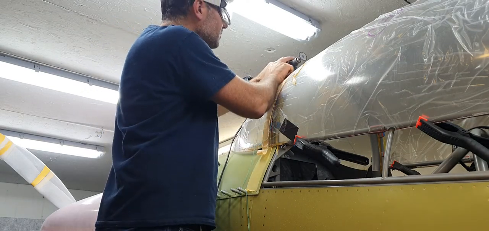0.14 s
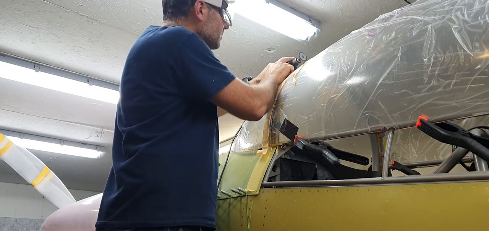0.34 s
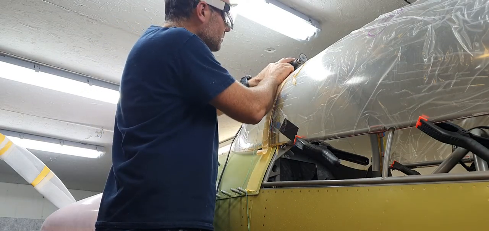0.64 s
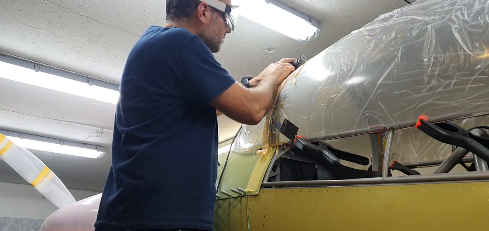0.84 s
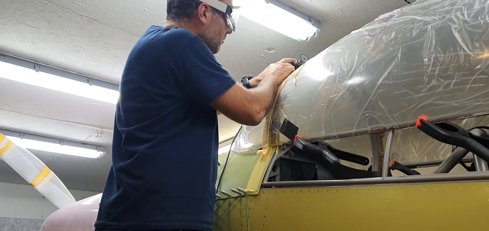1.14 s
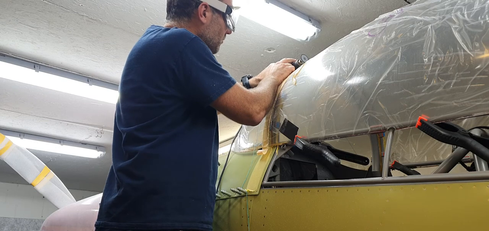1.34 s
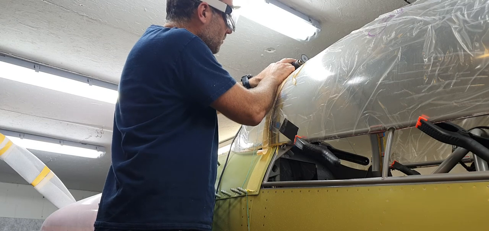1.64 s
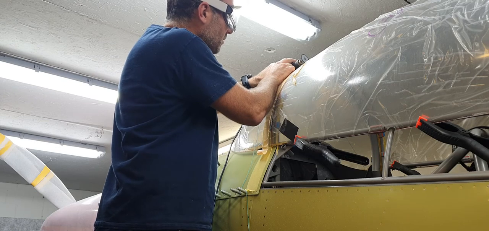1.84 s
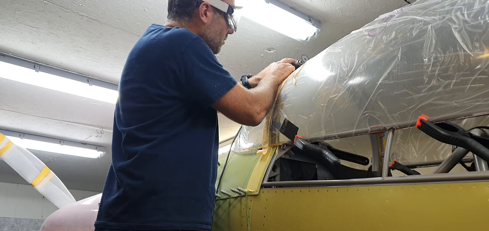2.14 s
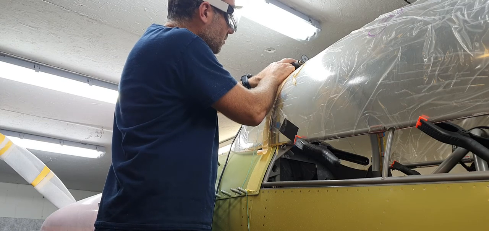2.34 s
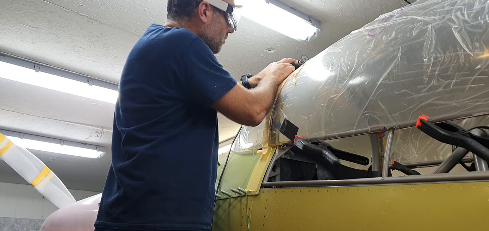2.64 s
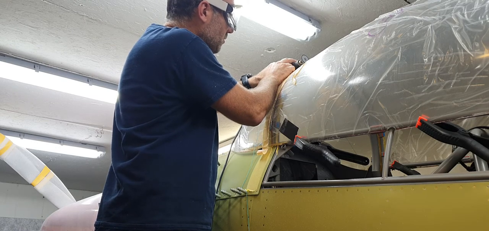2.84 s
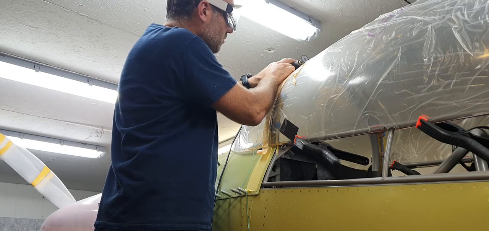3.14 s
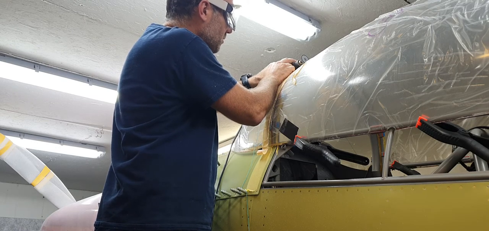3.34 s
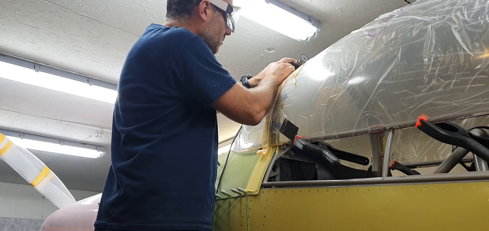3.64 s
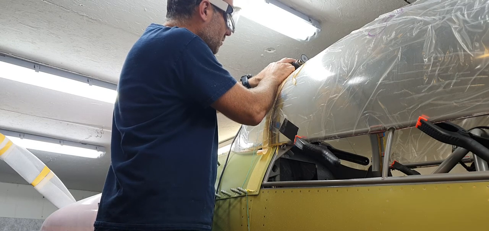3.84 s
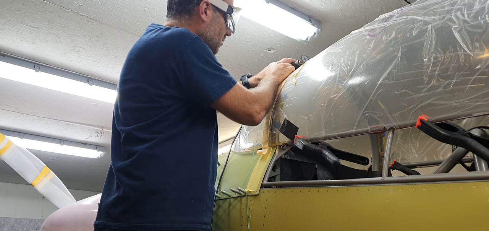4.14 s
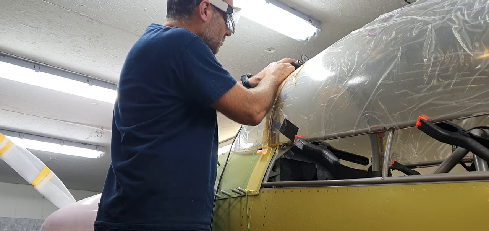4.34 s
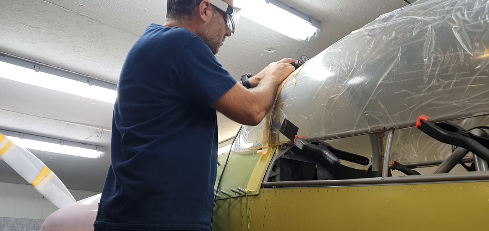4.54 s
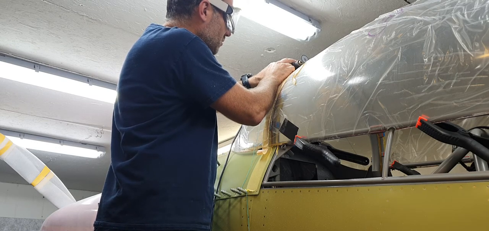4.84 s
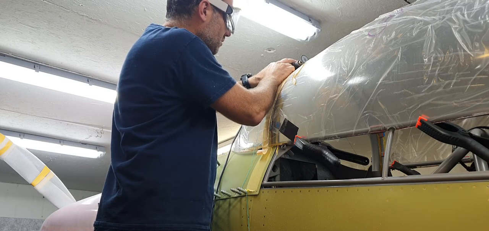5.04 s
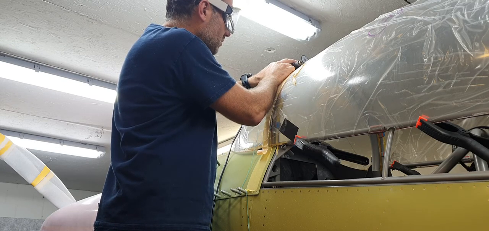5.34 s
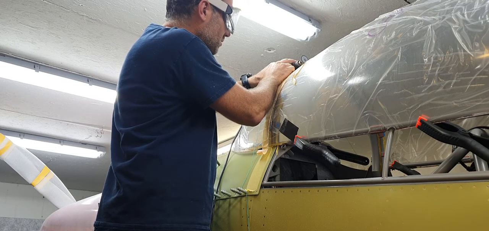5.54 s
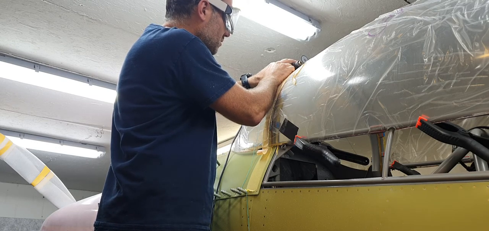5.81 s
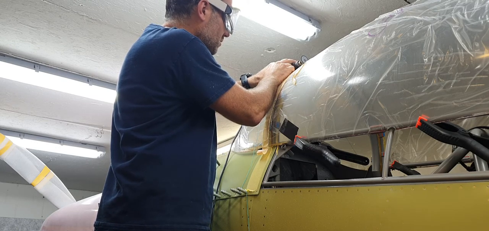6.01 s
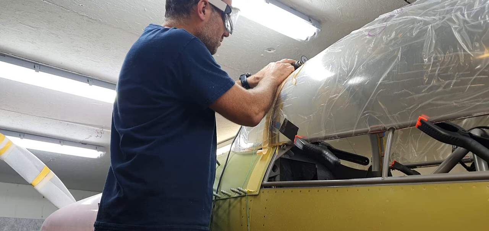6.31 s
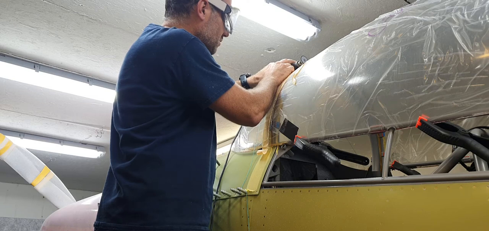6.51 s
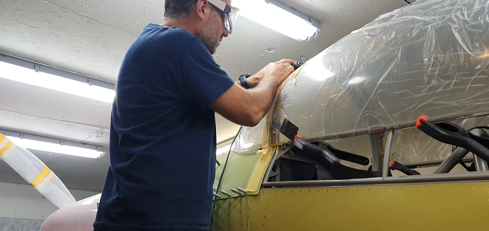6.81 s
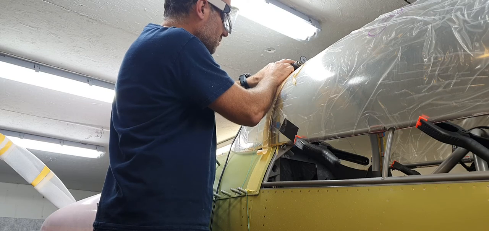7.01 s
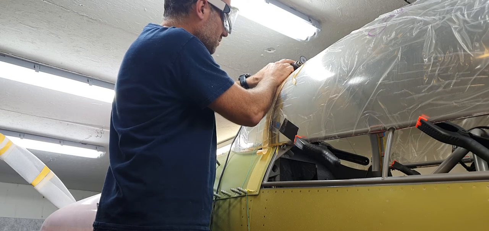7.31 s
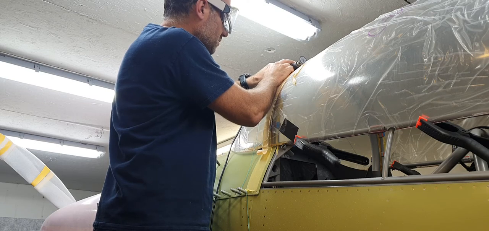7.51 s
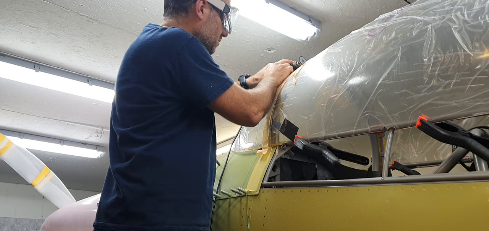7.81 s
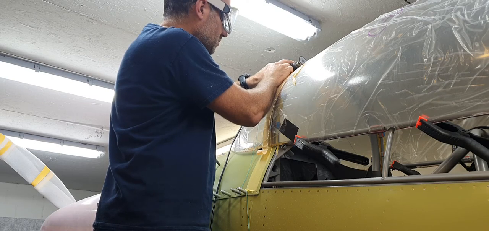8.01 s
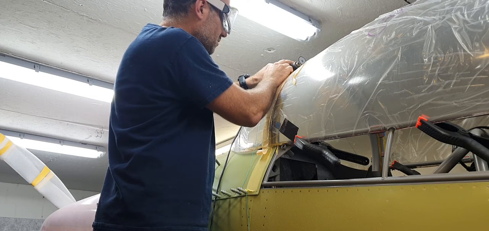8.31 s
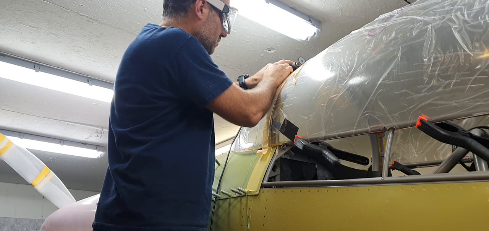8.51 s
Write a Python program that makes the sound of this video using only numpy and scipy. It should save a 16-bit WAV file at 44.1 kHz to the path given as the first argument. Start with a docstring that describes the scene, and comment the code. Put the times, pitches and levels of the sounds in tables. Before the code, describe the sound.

A handheld rotary tool runs close by in a live, hard-surfaced workshop, with a steady nasal whine, raspy electrical buzz and thin fan whistle. Brief light bites interrupt it after two seconds. From about four and a half seconds the wheel stays in the plastic, chattering, grinding and hissing with flying chips, while the pitch sags, recovers partly and sags again. A low room rumble sits underneath. Stereo pickup is fairly close.

```python
"""Rotary tool on acrylic

A hand-held rotary tool trims an acrylic canopy in a workshop, over a low room rumble.
Mains bursts, 100 a second, make brush noise rasp and armature tones buzz; a fan whistles and the iron hums.
Sines locked to the turning shaft make the whine; as the wheel is pushed in they swell, and rippling
strokes chatter through the canopy while filtered noise grinds and hisses as chips."""
import sys
import numpy as np
from scipy import signal
from scipy.fft import rfft, irfft, next_fast_len
from scipy.io import wavfile

SR = 44100
rng = np.random.default_rng(int(sys.argv[2]) if len(sys.argv) > 2 else 0)


def persist_wave(psi):
    """Save psi, clipped to +-1, as 16-bit WAV."""
    counts = np.round(np.clip(psi, -1, 1) * 32767).astype(np.int16)
    wavfile.write(sys.argv[1], SR, np.atleast_2d(counts).T)


N = 381906

# Shaft speed. Each row: time in seconds, speed in turns per second.
SHAFT_SPEED = [(0.0, 485.8), (0.21, 481.4), (0.65, 488.3), (0.95, 480.5), (1.3, 487.8), (1.9, 483.2),
               (2.6, 484.0), (3.12, 476.8), (3.36, 480.8), (3.56, 490.8), (4.41, 482.2), (4.65, 475.2),
               (4.89, 472.5), (5.4, 446.2), (5.72, 435.1), (6.03, 413.9), (6.4, 407.6), (6.66, 435.0),
               (6.98, 451.4), (7.2, 443.5), (7.38, 435.1), (7.8, 451.6), (8.16, 435.9), (8.42, 410.1),
               (8.66, 410.0)]
# Shaft whine, multiples 1 to 4 of the speed. Each row: level of the free shaft in dB at resting skitter,
# change in dB per unit of skitter above rest.
WHINE_PARTIALS = [(-40, -15.5), (-49, -3.5), (-44, -5.5), (-40.5, -12)]
# Motor level ahead of the load trims. Each row: time in seconds, level in dB.
MOTOR_LEVEL = [(0, -24.5), (1.3, -24), (2.9, -23), (3.5, -26), (4.4, -24.5), (4.8, -22), (5.5, -21.5),
               (6.4, -26), (7.3, -20.5), (8.66, -23)]
# The canopy's broad answer to the wheel's strokes. Each row: frequency in Hz, relative gain in dB.
CANOPY_ANSWER = [(140, -18), (255, -9), (345, -13), (520, -16.5), (650, 3), (760, 1), (1000, -2),
                 (1180, 0.5), (1600, 0.5), (2150, -2), (2500, -1), (3500, -3.5), (4600, -8), (7000, -15.5)]
# Noise colours of brush sparks, grinding, flying chips and room rumble.
# Each row: frequency in Hz, relative gain in dB.
SPARK_COLOUR = [(150, -26), (280, -14), (420, -33), (700, -18), (1000, -7.5), (1350, -15), (1550, -13.5),
                (1900, -7), (2500, -3.5), (3050, -10), (3750, -5.5), (4500, -10), (5800, -14.5),
                (7000, -24), (15800, -34)]
GRINDING_COLOUR = [(120, -42), (200, -3), (270, -17), (380, -4), (540, -9), (700, 0.5), (950, -0.5),
                   (1300, -1), (1700, -3.5), (2150, -13), (3100, -5.5), (4500, -10), (7000, -18.5)]
CHIP_COLOUR = [(2000, -8), (3200, 4.5), (5000, 4.5), (6500, 1), (7600, -6), (9500, -1), (12500, -4.5),
               (14500, -5), (15900, -13)]
RUMBLE_COLOUR = [(22, -34), (40, -7), (60, -2.5), (85, 2.5), (125, -4.5), (200, -3), (300, -5.5),
                 (600, 0.5), (2000, -34)]
# Hum of the motor's iron without load. Each row: frequency in Hz, level in dB.
IRON_HUM = [(200, -53), (300, -70)]
# Colour of the reflections off the walls. Each row: frequency in Hz, gain in dB.
REFLECTION_COLOUR = [(60, -12.5), (250, -14), (500, -9), (800, -7), (1400, 0.5), (2800, -2), (5600, 0.5),
                     (11000, 1.5)]
# Stereo lean, of which each side takes a share. Each row: frequency in Hz, left over right in dB.
STEREO_LEAN = [(100, -0.5), (350, 1), (700, 4.5), (1400, 3.2), (2800, -3.5), (5600, 8.5), (10000, -1),
               (14000, 5.5)]
# Fan whistle. Each row: multiple of the shaft speed, level in dB over the fan level.
FAN_TONES = [(12, -4), (16, -6), (23, -18), (24, 0), (25, -12)]
# Armature buzz. Each entry: relative level in dB, for multiples 4 to 16 of the shaft speed.
ARMATURE_PARTIALS_DB = (-22, -8.5, -20, -1.5, 1.5, -7, -11.5, -7, -8, -44, -43, -44, -12.5)
# Resonances of the tool's housing. Each row: frequency in Hz, width in Hz, peak in dB over the direct sound.
HOUSING_RINGS = [(2507, 40, -6), (2660, 21, -1.5), (3214, 36, -6), (3520, 15, -13), (3602, 17, 4),
                 (3764, 17, 3), (4157, 30, 3), (4556, 61, -3.5)]
# Torque ripple. Each entry: relative level in dB, for 1 to 4 times the burst rate.
TORQUE_RIPPLE_DB = (-6.5, 4, -9.5, -4.5)
# Rumble of the room. Each row: time in seconds, level in dB.
RUMBLE_LEVEL = [(0, -45.5), (3, -42.5), (5.2, -49.5), (8.66, -51)]
# Pushes of the wheel into the plastic, levels ahead of the mix trims. Each row: time of full force in seconds,
# hold in seconds, chatter in dB, grinding in dB, chip hiss in dB, skitter from 0 to 1.
WHEEL_PUSHES = [(2.203, 0.025, -27, -32.5, -41, 0.1), (2.667, 0.21, -26, -28.5, -37, 0.27),
                (2.94, .1, -24, -26.5, -34, 0.84), (3.221, .08, -28, -29, -41, 0.6),
                (4.512, .07, -21.5, -26, -29, 0.7), (4.606, 0.2, -25.5, -26, -38, 0.86),
                (4.874, 0.15, -23, -24.5, -32.5, 0.3), (5.027, 0.336, -22, -31, -31.5, 0.13),
                (5.4, 0.3, -23.5, -38, -31.5, 0.3), (5.704, 0.25, -22.5, -40, -32.5, 0.18),
                (5.998, 0.099, -25.5, -33, -34.5, 0), (6.194, .24, -26, -31, -31.5, 0.28),
                (6.682, 0.16, -23.5, -38, -30, 0.36), (6.948, 0.23, -23.5, -39, -29, 0.06),
                (7.154, 0.49, -25, -35, -30.5, .33), (7.72, 0.19, -21.5, -36, -30, 0.2),
                (7.956, 0.17, -24.5, -34.5, -30, 0.36), (8.115, 0.18, -22.5, -37.5, -28.5, 0.3),
                (8.398, 0.33, -27, -34.5, -32, 0.3)]
# Wheel spinning free, then resting in its groove, ahead of the mix trims.
# Each holds: chatter in dB, grinding in dB, chip hiss in dB.
FREE_WHEEL_DB = (-40, -51, -40)
GROOVE_WHEEL_DB = (-28.5, -35.5, -34)
# Canopy rings under whine and chatter. Each row: frequency in Hz, width in Hz, relative peak in dB.
CANOPY_MODES = [(264, 18, 1.5), (437, 69, -5), (670, 36, -4), (749, 22, 0.5), (824, 63, 1), (880, 9.7, 1),
                (929.5, 61, -1.5), (1074, 87, -3), (1148, 13, 4), (1250, 116, -3.5), (1350, 17, -5.5),
                (1408, 60, -6.5), (1609, 80, -1), (2820, 140, -1)]

BURST_HZ = 100
ROOM_T60_S = 1
CUTOFF_HZ = 15950
# The motor labours below the free speed; full load comes this much lower (turns per s).
FREE_SPEED, FULL_LOAD_SAG = 480, 18
# Linear build-up of a push, and the time constant of its letting go.
PUSH_ATTACK_S, PUSH_RELEASE_S = 0.069, 0.077
# The wheel sits fully in its groove from here on; skitter (0-1) between pushes.
GROOVE_FROM_S, REST_SKITTER = 4.5, 0.2
# Fan level at top speed (dB), dB lost per turn per s below it, top speed (turns per s).
FAN_DB, FAN_LOSS_DB, FAN_TOP_SPEED = -38.5, 0.55, 487


def from_db(db):
    """Decibels to gain."""
    return 10 ** (np.asarray(db) / 20)


def rms_one(x):
    """Scale to rms 1."""
    return x / np.sqrt(np.mean(x ** 2) + 1e-20)


def in_time(rows):
    """Read a two-column curve over time at every sample."""
    seconds, values = np.transpose(rows)
    return np.interp(np.arange(N) / SR, seconds, values)


def at_hz(points, hz):
    """Read a spectrum on a log-frequency axis."""
    f, value = np.transpose(points)
    return np.interp(np.log(np.maximum(hz, 1)), np.log(f), value)


def colour(x, points, share=1):
    """Filter a sound by a spectrum in dB, or by a share of it."""
    size = next_fast_len(N + 8192)
    hz = np.arange(size // 2 + 1) * SR / size
    gain = from_db(share * at_hz(points, hz))
    return irfft(rfft(x, size) * gain, size)[:N]


def drift(rate):
    """Smooth random wander of rms 1 that changes about rate times a second."""
    r = np.exp(-40 * np.pi * rate / SR)
    noise = rng.standard_normal(N // 20 + 2002)  # one point every 20 samples
    slow = signal.lfilter([1], [1, -2 * r, r * r], noise)[2000:]  # drop the filter's settling
    return np.interp(np.arange(N) / 20, np.arange(len(slow)), rms_one(slow))


def tone(cycles):
    """A sine of rms 1 that starts anywhere in its cycle."""
    return np.sqrt(2) * np.cos(2 * np.pi * (cycles + rng.random()))


def bursts(rise, fade, rest, delay=0.0026):
    """Current switched on in every half wave of the mains swells and dies away; times in burst periods."""
    since = (np.arange(N) * BURST_HZ / SR - delay) % 1
    pulse = (1 - np.exp(-since / rise)) * np.exp(-since / fade)
    return rms_one(abs(rest) + pulse / pulse.max())


def housing(x):
    """Narrow resonances of the tool's shell light up each partial that glides across them."""
    out = x
    for hz, width_hz, db in HOUSING_RINGS:
        ring = signal.lfilter(*signal.iirpeak(hz, hz / width_hz, fs=SR), x)
        out = out + from_db(db) * ring
    return rms_one(out)


def motor(turns, load, per_turn=0.34, sway_db=2.5):
    """Brush sparks and armature buzz come with each burst; under load the current flows more evenly."""
    pulsing = 1 + load * (0.52 - 1)  # burst depth falls to 0.52 at full load
    spark_bursts = 1 + pulsing * (bursts(rise=0.12, fade=0.57, rest=3.2) - 1)
    current = spark_bursts * from_db(drift(76))
    brush_turn = 1 + per_turn * np.cos(2 * np.pi * turns)
    sparks = colour(rng.standard_normal(N) * current * brush_turn, SPARK_COLOUR)
    buzz = 0
    for k, db in enumerate(ARMATURE_PARTIALS_DB, start=4):
        buzz = buzz + from_db(db + sway_db * drift(9)) * tone(k * turns + 0.04 * drift(12))
    buzz = buzz * (1 + pulsing * (bursts(rise=0.04, fade=0.11, rest=0.1) - 1))
    spark_gain, buzz_gain = from_db(-1.5 - 6 * load), from_db(-5 - 5 * load)
    return spark_gain * housing(sparks) + buzz_gain * housing(buzz)


def fan(turns, speed, flutter_db=1.5, waver_db=1.8):
    """The fan whistles at high multiples of the speed, flutters as the hands move and fades as the shaft slows."""
    slowing = np.maximum(FAN_TOP_SPEED - speed, 0)
    level_db = FAN_DB - FAN_LOSS_DB * slowing + waver_db * drift(4.8)
    return sum(from_db(level_db + db + flutter_db * drift(26)) * tone(k * turns) for k, db in FAN_TONES)


def hum(load, load_db=6):
    """The iron hums at multiples of the burst rate, louder under load."""
    t = np.arange(N) / SR
    tones = sum(from_db(db) * tone(round(hz / BURST_HZ) * BURST_HZ * t) for hz, db in IRON_HUM)
    return from_db(load_db * load) * tones


def rumble():
    """Low noise of the room, riding a slow level curve."""
    return from_db(in_time(RUMBLE_LEVEL)) * rms_one(colour(rng.standard_normal(N), RUMBLE_COLOUR))


def canopy_rings(hz):
    """Power with which the canopy's resonances answer a frequency."""
    power = 0
    for ring_hz, width_hz, db in CANOPY_MODES:
        detuning = 2 * (hz - ring_hz) / width_hz
        power = power + (from_db(db) / (1 + detuning ** 2)) ** 2
    return power


def whine(turns, speed, drive, skitter, shake=0.039, flutter_db=3.5, sway_db=1.0):
    """Unbalance sounds the lowest multiples of the speed; each stroke swells where it meets a canopy ring."""
    out = 0
    for k, (free_db, skitter_db) in enumerate(WHINE_PARTIALS, start=1):
        level = np.sqrt(from_db(free_db) ** 2 + drive ** 2 * canopy_rings(k * speed))
        unrest_db = skitter_db * (skitter - REST_SKITTER)
        unrest_db = unrest_db + flutter_db * skitter * drift(24) + sway_db * drift(5.1)
        out = out + level * from_db(unrest_db) * tone(k * turns + shake * skitter * drift(8.8))
    return out


def press(start, length):
    """Force of one push, 0-1: it builds up to its start, holds for its length and lets go."""
    t = np.arange(N) / SR
    build = np.clip(1 + (t - start) / PUSH_ATTACK_S, 0, 1)
    return build * np.exp(-np.maximum(t - start - length, 0) / PUSH_RELEASE_S)


def contact():
    """Wheel on plastic: the loudest push or rest state sets each gain; pushes blend their skitter by force."""
    in_groove = from_db(GROOVE_WHEEL_DB)[:, None] * press(GROOVE_FROM_S, N / SR)
    gains = np.maximum(from_db(FREE_WHEEL_DB)[:, None], in_groove)
    weight, skips = 0, 0
    for start, length, *levels_db, skitter in WHEEL_PUSHES:
        force = press(start, length)
        gains = np.maximum(gains, from_db(levels_db)[:, None] * force)
        weight = weight + force
        skips = skips + force * (skitter - REST_SKITTER)
    skitter = np.clip(REST_SKITTER + skips / np.maximum(weight, 1), 0, 1)
    return (*gains, skitter)


def chatter(turns, skitter, shake=0.11, flutter_db=2, sway_db=1.6, upper_db=-1.0, rings_db=4, count=14):
    """The wheel strikes once a turn; rippling torque adds side tones, and housing and canopy colour them."""
    mains = np.arange(N) * BURST_HZ / SR
    # three ripples, each with its own phases, shared out among the partials
    ripples = [sum(from_db(db) * tone(m * mains) for m, db in enumerate(TORQUE_RIPPLE_DB, start=1))
               for _ in range(3)]
    strokes = 0
    for k in range(1, count + 1):
        above_whine = k > 4  # whine() already holds the steady tones 1 to 4
        torque = above_whine * from_db(upper_db) + ripples[k % len(ripples)]
        strokes = strokes + torque * from_db(sway_db * drift(3.5)) * tone(k * turns + shake * skitter * drift(23.5))
    strokes = strokes * from_db(flutter_db * skitter * drift(70))
    hz = np.geomspace(50, 16000, 2000)
    rings = 1 + from_db(rings_db) ** 2 * canopy_rings(hz)
    answer_db = at_hz(CANOPY_ANSWER, hz) + 10 * np.log10(rings)
    return housing(colour(strokes, np.column_stack([hz, answer_db])))


def scrape(turns, spectrum, per_turn, grain_db, surge_db):
    """Grit tears out chips of uneven size in surges, most of them on the wheel's high side."""
    high_side = 1 + per_turn * np.cos(2 * np.pi * turns)
    bite = high_side * from_db(grain_db * drift(400) + surge_db * drift(9.1))
    return rms_one(colour(rng.standard_normal(N) * bite, spectrum))


def workshop(x, wet_db, early_s=0.01, early_db=7):
    """Reflections off canopy and ceiling, then a diffuse tail: part is common to both sides, part differs."""
    t = np.arange(SR // 2) / SR
    decay = from_db(-60 * t / ROOM_T60_S) + from_db(early_db) * np.exp(-t / early_s)
    echoes = rng.standard_normal((2, len(t))) * decay
    common, side = [colour(signal.fftconvolve(x, e / np.linalg.norm(e))[:N], REFLECTION_COLOUR)
                    for e in echoes]
    mid = x + from_db(wet_db) * common
    return np.array([mid + side, mid - side])


def scene():
    """Motor, whine and cut share one turning shaft; tool and canopy each reach the room by their own paths."""
    speed = in_time(SHAFT_SPEED)
    load = np.clip((FREE_SPEED - speed) / FULL_LOAD_SAG, 0, 1)
    turns = np.cumsum(speed * (1 + 0.000597 * drift(6.42))) / SR  # slight wander of the speed
    drive, grinding, chips, skitter = contact()

    tool = from_db(in_time(MOTOR_LEVEL)) * motor(turns, load) + fan(turns, speed) + hum(load)
    shaft = whine(turns, speed, drive, skitter)
    canopy = from_db(0.5) * drive * chatter(turns, skitter)
    grind = grinding * scrape(turns, GRINDING_COLOUR, per_turn=1.0, grain_db=3.5, surge_db=-0.4)
    hiss = chips * scrape(turns, CHIP_COLOUR, per_turn=0.32, grain_db=0.5, surge_db=0.5)
    dust = from_db(1.0) * grind + from_db(3.5) * hiss

    left, right = (workshop(tool, wet_db=-6.5) + workshop(canopy, wet_db=-3.5)
                   + workshop(shaft, wet_db=-13.5) + workshop(dust + rumble(), wet_db=-5.5))
    return np.array([colour(left, STEREO_LEAN, share=0.19), colour(right, STEREO_LEAN, share=-0.65)])


def record(dry):
    """The deepest bass is shed; the top is cut steeply."""
    thin = signal.sosfilt(signal.butter(3, 45, "high", fs=SR, output="sos"), dry)
    return signal.sosfilt(signal.ellip(12, 0.1, 90, CUTOFF_HZ, fs=SR, output="sos"), thin)


dry = scene()
out = record(dry)
persist_wave(out)
```